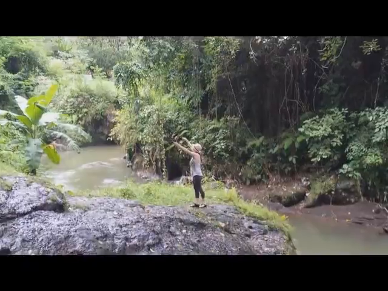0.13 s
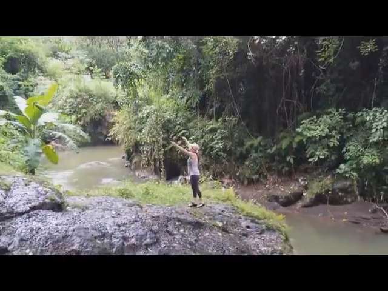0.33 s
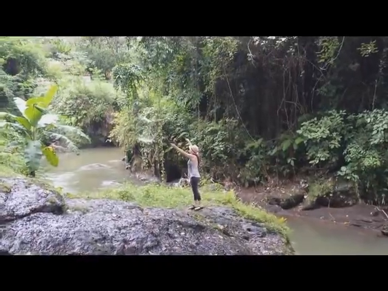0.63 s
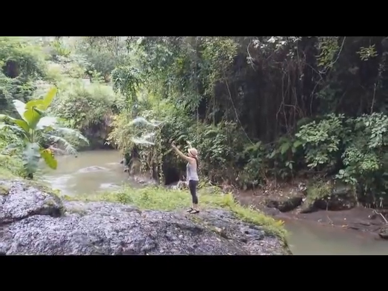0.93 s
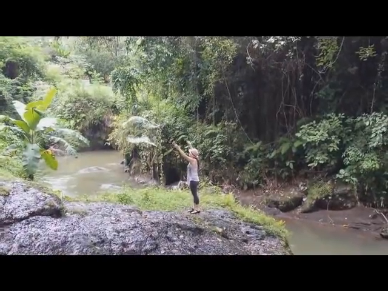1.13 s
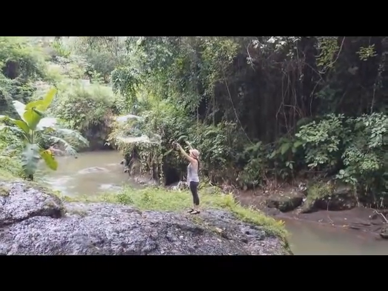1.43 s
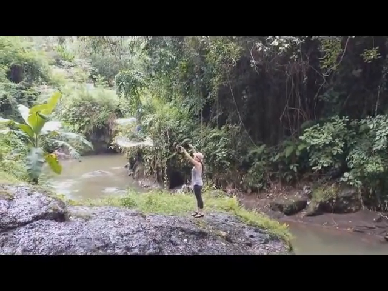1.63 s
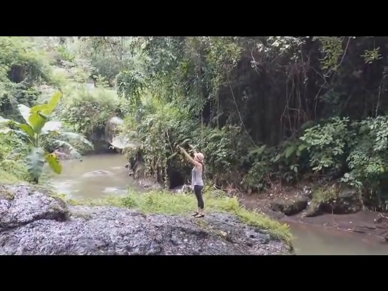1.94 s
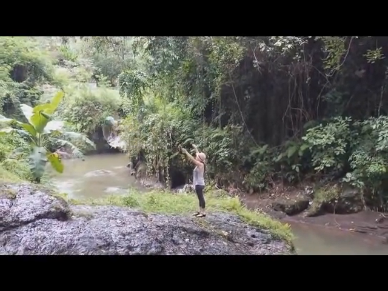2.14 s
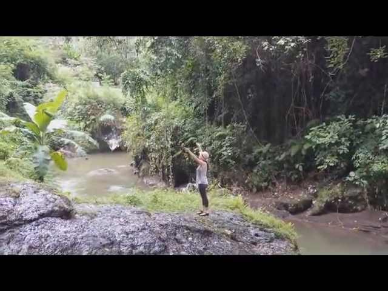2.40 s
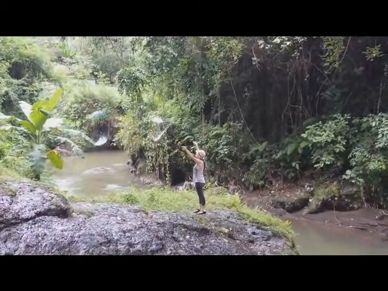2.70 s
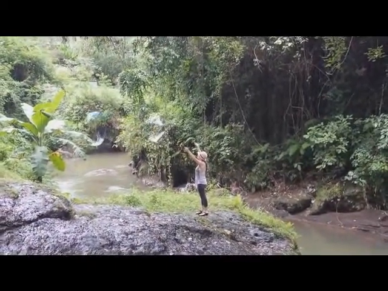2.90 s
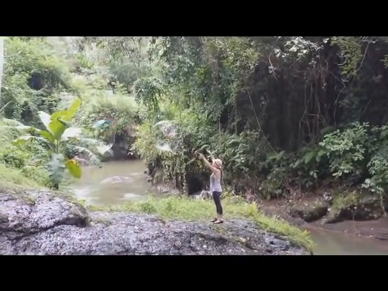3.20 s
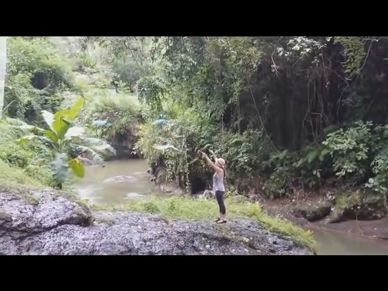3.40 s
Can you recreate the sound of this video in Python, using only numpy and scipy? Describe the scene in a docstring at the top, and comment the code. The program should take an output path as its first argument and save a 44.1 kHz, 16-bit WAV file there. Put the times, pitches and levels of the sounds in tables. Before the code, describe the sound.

River rapids churn in a steady, dense rush with bright fizzing spray; small splashes, soft gurgles, and a clear trickle flicker over it. Outdoors in an overgrown gorge, stereo microphone on the rocky bank.

```python
"""River rapids in a narrow, overgrown gorge, heard in stereo from a rock on the bank. Shaped noise of bursting
bubbles makes the churning rush and, above 4 kHz, a bright fizz of spray. Short noise clouds splash over it;
decaying sines make low gurgles, babble, a clear trickle and a few ticks. Left and right of the spray grow more
alike in two steps, the lower band first."""
import sys
import numpy as np
from scipy import signal
from scipy.fft import rfft, irfft
from scipy.io import wavfile
from scipy.ndimage import uniform_filter1d

SR = 44100
rng = np.random.default_rng(int(sys.argv[2]) if len(sys.argv) > 2 else 0)


def wrap_up_sound(samples):
    """Save the sound to the file named by the first command line argument, as 16-bit audio."""
    columns = np.atleast_2d(samples).T
    # keep every value between -1 and 1, then stretch to whole-number steps
    tamed = np.clip(columns, -1, 1)
    steps = np.round(tamed * 32767).astype(np.int16)
    wavfile.write(sys.argv[1], SR, steps)


N = 156555

# Body of the river, before RUSH_TRIM_DB. Each row: frequency in Hz, left density in dB per Hz,
# right density in dB per Hz, left-right likeness 0-1, phase lead of the left in rad.
RUSH_SPECTRUM = [(25, -96, -93, 0.15, 6), (45, -81, -98, 0.17, 4), (65, -73.5, -73.5, 0.8, -0.5),
                 (115, -75, -73, 0.9, 0.8), (162, -70.5, -69.6, 1, 0.64), (340, -69, -69.5, 0.68, 0.06),
                 (740, -70, -68, 0.45, 1.67), (787, -69.5, -70.5, 0.33, 1.5), (1350, -71, -70.5, 0.67, 3.5),
                 (1814, -67, -70.5, 0.26, 2), (2210, -66.5, -69, 0.38, 0.14), (3040, -73, -71, 0.01, -3),
                 (3730, -74, -71.5, 0.28, 2.5)]
# Spray of the white water, before SPRAY_TRIM_DB and SPRAY_COURSE.
# Each row: frequency in Hz, left density in dB per Hz, right density in dB per Hz.
SPRAY_SPECTRUM = [(4300,-67,-68),(4960,-65,-67.5),(5760,-66,-67.5),(6460,-65.5,-66.5),(7350,-67.5,-67),(8160,-68,-65.5),(9270,-73.5,-65),(10300,-79.5,-68),(12700,-73,-70.5),(12900,-93,-77)]
# Course of the spray, on top of its spectrum. Each row: time in seconds, level in dB, added left minus right
# in dB of the lower and of the top band, left-right likeness 0-1 of the lower and of the top band.
SPRAY_COURSE = [(.05, -1.6, 0.77, -3.5, 0.08, .02), (.6, -0.63, 1, -4.5, 0.055, .02),
                (.72, -0.35, 0.6, -2, 0.76, .06), (1.25, -0.14, 0.098, -2.5, .76, 0.096),
                (2.05, -0.041, -0.8, -1.5, 1, 0.21), (2.25, 0.95, -0.79, 1.5, 0.97, 0.65),
                (2.7, 0.035, -1.1, 1, 1, 0.69), (3.25, 0.31, -0.89, 1.5, 1, 0.64),
                (3.54, 0.23, -0.62, -1.5, 0.99, 0.41)]
# Breaking wavelets. Each row: crest in seconds, level in dB before SPLASH_TRIM_DB, centre in Hz,
# width in octaves, fall to 1/e in seconds, left minus right in dB.
WAVELETS = [(0.142, -31, 2150, .15, 0.012, 5), (0.243, -34, 9500, 0.27, 0.0082, -8),
            (0.325, -31, 7800, 0.78, 0.035, -5), (0.654, -31.5, 2280, .14, 0.029, 2),
            (0.927, -22.5, 4650, .14, 0.015, -2), (0.938, -30, 6300, 0.23, .035, 0),
            (1.263, -28, 7000, 0.42, .025, -2), (1.35, -33, 6800, 0.27, .04, 0),
            (1.637, -29.5, 7200, 0.46, 0.066, -6), (1.64, -32.5, 2420, 0.35, 0.047, -2),
            (1.72, -35, 2380, 0.22, 0.028, 3), (1.82, -31, 7000, 0.37, .025, 0),
            (1.957, -28.5, 5400, 0.48, 0.041, -3), (1.968, -32.5, 2300, 0.21, 0.025, 0),
            (2.072, -22.5, 6900, 0.21, 0.011, 1), (2.09, -34, 9000, .25, .02, -7),
            (2.32, -28, 7840, .33, 0.058, -3), (2.799, -30, 5530, 0.4, 0.014, 4),
            (2.873, -32, 8950, .25, .035, -2), (2.925, -27, 5500, 0.32, 0.025, 4),
            (2.961, -31, 5600, 0.33, .022, 5), (2.994, -32, 6500, .2, .015, 9),
            (3.072, -31, 5400, .35, .02, -4), (3.514, -26.5, 5430, 0.33, 0.035, 4)]
# Large pockets of trapped air. Each row: start in seconds, level in dB before GURGLE_TRIM_DB,
# initial pitch in Hz, cycles to fade by 1/e.
AIR_POCKETS = [(.085, -30.5, 178, 5.6), (0.227, -28, 345, 5.4), (.755, -31, 219, 6.6),
               (1.954, -24.5, 350, 2.9), (1.956, -23.5, 256, 2.3), (2.015, -27.5, 191, 4.1),
               (2.095, -29, 160, 2.5), (2.727, -33, 231, 4.9), (2.808, -28.5, 377, 5.9)]
# Drops landing close by on the right. Each row: start in seconds, right peak in dB before the treble cut.
NEAR_DROPS = [(.3394, -13), (.495, -21), (1.135, -21), (1.257, -18), (1.642, -19)]

RUSH_TRIM_DB, SPRAY_TRIM_DB, SPLASH_TRIM_DB, GURGLE_TRIM_DB = -0.3, -0.54, -3.5, -6
RUSH_RISE_DB_PER_S = 0.32
CROSSOVER_HZ, TOP_BAND_HZ, TREBLE_CUT_HZ = 4060, 7750, 13000
SURGE_DB, SURGE_RATE_HZ = 0.44, 24
FIZZ_POPS_PER_S, FIZZ_SPREAD_DB, FIZZ_NEAR_POWER_SHARE = 9000, 2.7, 0.42
SPLASH_ATTACK_RATIO, SPLASH_LIKENESS = 0.14, 0.99  # attack relative to the fall
BUBBLE_GLIDE_RATIO = 0.031  # rise of pitch while fading by 1/e
BABBLE_BASE_DB, BABBLE_LOW_HZ, BABBLE_HIGH_HZ, BABBLE_FADE_CYCLES = -49.5, 208.8, 2720, 5.3
TRICKLE_BASE_DB, TRICKLE_SPREAD_DB = -49.5, 2.5
TRICKLE_LOW_HZ, TRICKLE_HIGH_HZ, TRICKLE_FADE_CYCLES = 643, 10890, 25.3
DROP_HZ, DROP_FADE_S, DROP_LEFT_DB = 8640, 0.000087, -10  # left relative to right
START_S, FADE_IN_S = 0.039, 0.013
T = np.arange(N) / SR
F = np.maximum(np.fft.rfftfreq(N, 1 / SR), 1)


def rush():
    """The churning body of the river, returned from all sides by the gorge: bubble noise below the crossover."""
    left_db, right_db, likeness, lead_rad = read(RUSH_SPECTRUM, F, np.log)
    water = rfft(churn(fizz(), slow_db=-0.05, slow_hz=11, quick_db=0.73, quick_hz=38))
    left_colour = undb(left_db) * np.exp(1j * lead_rad)
    colour = np.array([left_colour, undb(right_db)])
    colour = colour * lowpass(CROSSOVER_HZ) * np.sqrt(SR / 2)  # density to gain
    rise_db = RUSH_RISE_DB_PER_S * (T - T.mean())
    return irfft(pair(water, likeness) * colour, N) * undb(RUSH_TRIM_DB + rise_db)


def spray():
    """Bright fizz of the white water: bubble noise in two bands, each with its own width and place."""
    level_db, lower_pan_db, top_pan_db, lower_likeness, top_likeness = read(SPRAY_COURSE, T)
    water = churn(fizz(), slow_db=-0.02, slow_hz=10.32, quick_db=0.96, quick_hz=45)
    highpass = np.sqrt(1 - lowpass(CROSSOVER_HZ) ** 2)
    colour = undb(read(SPRAY_SPECTRUM, F, np.log)) * highpass * np.sqrt(SR / 2)
    lower = lowpass(TOP_BAND_HZ) ** 2
    bands = [(lower, lower_pan_db, lower_likeness), (1 - lower, top_pan_db, top_likeness)]
    out = np.zeros((2, N))
    for band, pan_db, likeness in bands:
        coloured = irfft(rfft(pair(water, likeness)) * colour * band, N)
        out += coloured * undb(np.array([[.7], [-.3]]) * pan_db)
    return out * undb(SPRAY_TRIM_DB + level_db)


def splashes():
    """Each wavelet throws a short noise cloud of droplets around one pitch; lower ones come from all sides."""
    likeness = SPLASH_LIKENESS * (1 - lowpass(CROSSOVER_HZ) ** 2)
    droplets = pair(rfft(fizz()), likeness)
    out = np.zeros((2, N))
    for crest_s, db, hz, width_oct, fall_s, pan_db in WAVELETS:
        band = np.exp(-.5 * (np.log2(F / hz) / width_oct) ** 2)
        cloud = irfft(droplets * band, N)
        age = (T - crest_s) / fall_s
        age = np.where(age < 0, age / SPLASH_ATTACK_RATIO, age)
        swell = np.exp(-np.minimum(age ** 2, 20))
        side_db = np.array([[pan_db], [-pan_db]]) / 2
        out += undb(db + SPLASH_TRIM_DB + side_db) * cloud / cloud.std() * swell
    return out


def gurgles(count=260):
    """A few deep glugs of large air pockets amid the babble of many small bubbles."""
    out = np.zeros((2, N))
    for when, size, strength, side in rng.random((count, 4)):
        hz = BABBLE_LOW_HZ * (BABBLE_HIGH_HZ / BABBLE_LOW_HZ) ** size
        db = BABBLE_BASE_DB + 4.7 * strength ** 2 + 1.7 * size
        ring = bubble(hz, BABBLE_FADE_CYCLES) * undb(db)
        add(out, when * N / SR, place(ring, side))
    for start_s, db, hz, cycles in AIR_POCKETS:
        glug = bubble(hz, cycles) * undb(db + GURGLE_TRIM_DB)
        add(out, start_s, place(glug, 0.5))
    return out


def trickle(count=900):
    """Small bubbles at the near bank ring briefly and clearly; the higher ones are louder."""
    out = np.zeros((2, N))
    for when, pitch, chance, side in rng.random((count, 4)):
        height = np.sqrt(pitch)  # more high than low ones
        hz = TRICKLE_LOW_HZ * (TRICKLE_HIGH_HZ / TRICKLE_LOW_HZ) ** height
        nearness = min(-np.log(1 - chance), 4)
        db = TRICKLE_BASE_DB + TRICKLE_SPREAD_DB * nearness + 11 * height
        ring = bubble(hz, TRICKLE_FADE_CYCLES) * undb(db)
        add(out, when * N / SR, place(ring, side))
    return out


def drops():
    """Sharp, tiny ticks of single drops: sines that die within a cycle or so."""
    out = np.zeros((2, N))
    t = T[:SR // 200]
    tick = np.sin(2 * np.pi * DROP_HZ * t) * np.exp(-t / DROP_FADE_S)
    for start_s, db in NEAR_DROPS:
        add(out, start_s, undb([[db + DROP_LEFT_DB], [db]]) * tick / tick.max())
    return out


def fizz():
    """Three unrelated streams of tiny bursting bubbles, near ones over a blur of far ones; rms near 1."""
    pops = (rng.random((3, N)) < FIZZ_POPS_PER_S / SR) * rng.standard_normal((3, N))
    size_db = FIZZ_SPREAD_DB * np.minimum(rng.exponential(size=(3, N)), 7)
    near = np.sign(pops) * undb(size_db)
    far = rng.standard_normal((3, N))
    share = FIZZ_NEAR_POWER_SHARE
    return np.sqrt(share) * near / near.std() + np.sqrt(1 - share) * far


def churn(streams, slow_db, slow_hz, quick_db, quick_hz, count=10):
    """Each octave swells and flickers by itself, in step across the streams."""
    spectrum = rfft(streams)
    octave = np.clip(np.log2(F / TREBLE_CUT_HZ) + count - 1, 0, count - 1)
    out = np.zeros(streams.shape)
    for k in range(count):
        band = irfft(spectrum * np.maximum(1 - abs(octave - k), 0), N)
        level_db = slow_db * walk(slow_hz) + quick_db * walk(quick_hz)
        out += band * undb(level_db)
    return out


def bubble(hz, cycles):
    """A pocket of air rings as a sine, fades exponentially and rises in pitch."""
    fade_s = cycles / hz
    age = np.arange(int(6 * fade_s * SR)) / SR / fade_s
    phase = 2 * np.pi * cycles * (age + BUBBLE_GLIDE_RATIO * age ** 2 / 2)
    onset = 1 - np.exp(-age * 7)
    return np.sin(phase) * np.exp(-age) * onset


def pair(streams, likeness):
    """Left and right from one shared and two separate streams."""
    likeness = np.clip(likeness, 0, 1)
    return np.sqrt(likeness) * streams[0] + np.sqrt(1 - likeness) * streams[1:]


def place(sound, side):
    """Equal-power pan: side 0 is right, 1 is left."""
    return np.sqrt([[2 * side], [2 - 2 * side]]) * sound


def add(out, start_s, sound):
    """Mix a stereo sound in at a time."""
    i = int(np.clip(start_s * SR, 0, N - 1))
    out[:, i:i + sound.shape[1]] += sound[:, :N - i]


def walk(rate_hz):
    """Random levels, each held for one period, then averaged twice over a period; spread near 1."""
    hold = max(int(SR / rate_hz), 1)
    steps = rng.standard_normal(1024)[(np.arange(N) // hold) % 1024]
    return 1.35 * uniform_filter1d(uniform_filter1d(steps, hold), hold)


def lowpass(hz):
    """Steep low-pass gain whose power sums to 1 with its high-pass."""
    return 1 / np.sqrt(1 + (F / hz) ** 36)


def read(table, at, scale=np.asarray):
    """The columns of a table, joined by straight lines along its first one."""
    first, *columns = np.array(table).T
    return [np.interp(scale(at), scale(first), column) for column in columns]


def undb(db):
    """Decibels to gain."""
    return 10 ** (np.asarray(db) / 20)


def scene():
    """Rush and spray heave together; splashes, gurgles, trickle and drops stand out of them."""
    surge = undb(SURGE_DB * walk(SURGE_RATE_HZ))
    river = (rush() + spray()) * surge
    return river + splashes() + gurgles() + trickle() + drops()


def record(dry):
    """Silence, a quick fade-in, and a steep elliptic low-pass that cuts the top."""
    opened = dry * np.clip((T - START_S) / FADE_IN_S, 0, 1)
    treble_cut = signal.ellip(12, .1, 80, TREBLE_CUT_HZ, fs=SR, output="sos")  # 0.1 dB ripple, 80 dB stop
    return signal.sosfilt(treble_cut, opened)


dry = scene()
out = record(dry)
wrap_up_sound(out)
```